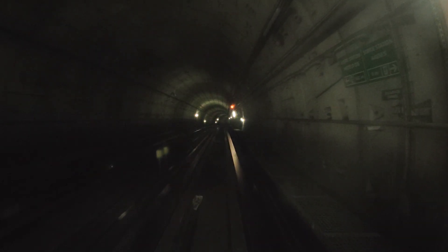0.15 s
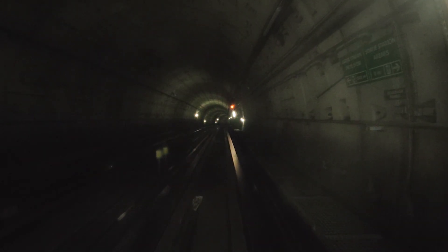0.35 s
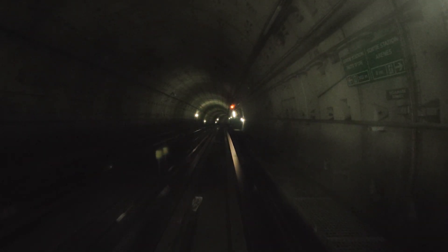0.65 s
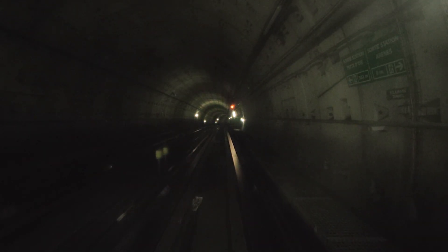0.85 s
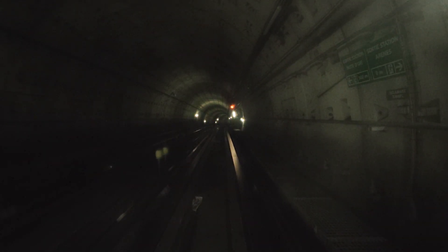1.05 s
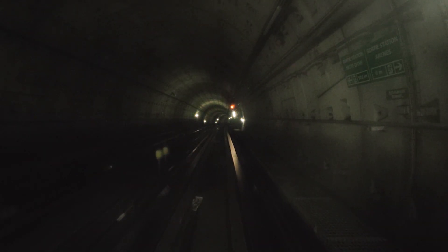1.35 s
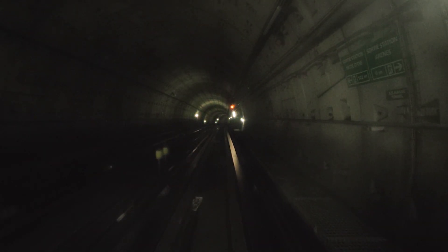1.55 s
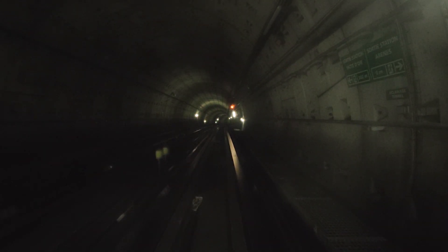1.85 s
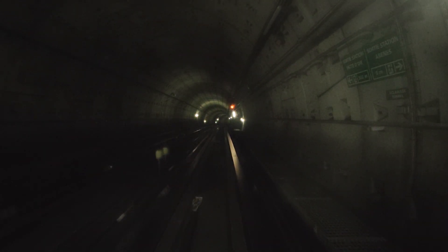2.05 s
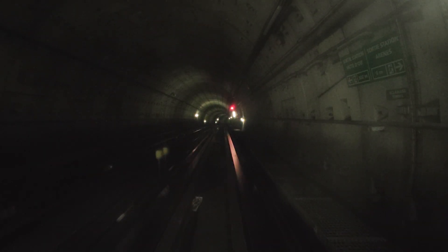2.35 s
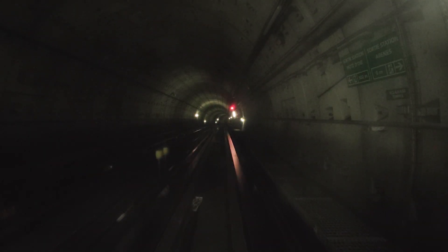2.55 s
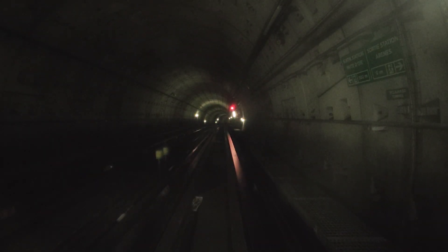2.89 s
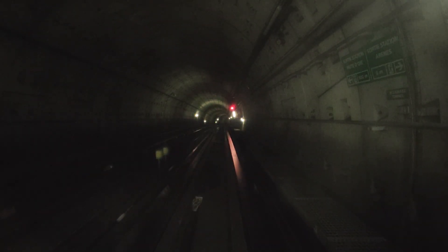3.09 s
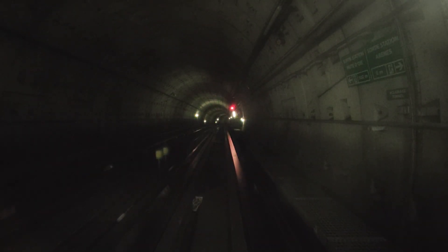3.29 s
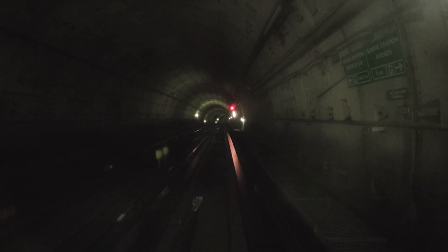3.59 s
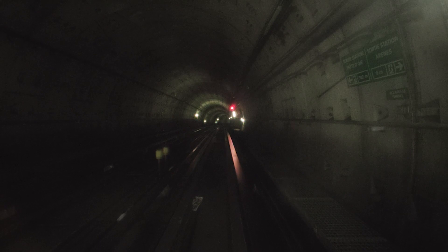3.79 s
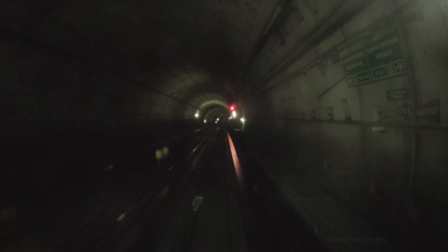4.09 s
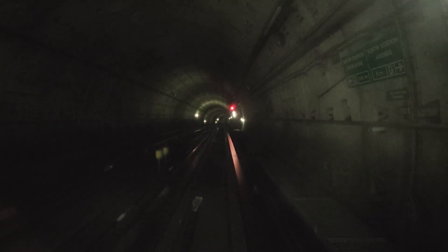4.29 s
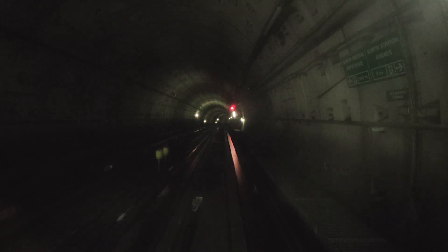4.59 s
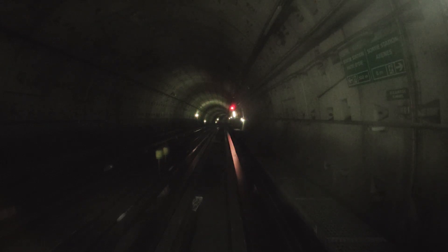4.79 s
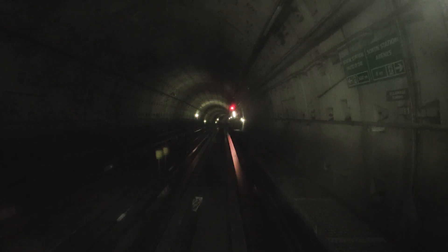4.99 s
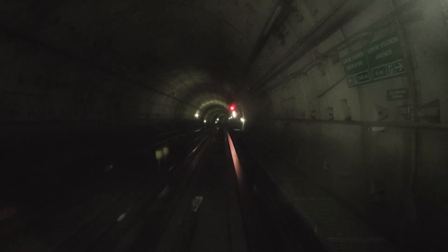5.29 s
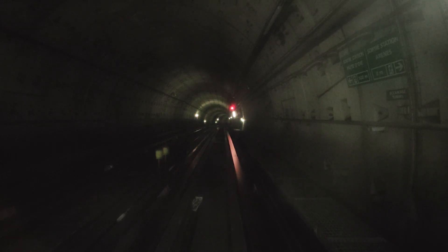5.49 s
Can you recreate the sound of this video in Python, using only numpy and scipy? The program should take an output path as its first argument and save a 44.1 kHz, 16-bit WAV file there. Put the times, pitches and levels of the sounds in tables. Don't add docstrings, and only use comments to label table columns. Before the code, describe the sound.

Interior of a rubber-tyred metro car in a tunnel, heard in stereo. Quiet uneven rumble and airy hiss come first, with small ticks. A low motor hum swells, then a loud double clunk stops it. Tunnel roar surges for over a second, then eases while latches and panels clack and rattle. A thin fan whine grows towards the end.

```python
import sys
import numpy as np
from scipy import signal
from scipy.io import wavfile
from scipy.ndimage import uniform_filter1d

SR = 44100
rng = np.random.default_rng(int(sys.argv[2]) if len(sys.argv) > 2 else 0)


def store_pcm(level_fs):
    pcm = np.round(np.clip(level_fs, -1, 1) * 32767).astype(np.int16)
    wavfile.write(sys.argv[1], SR, np.atleast_2d(pcm).T)


def volts_from_db(level):
    exponent = np.asarray(level, float) / 20
    return 10 ** exponent


N = 248724

# (frequency [Hz], density [dB per Hz])
FIZZ_COLOUR = [(3120, -9), (5300, -4.5), (6660, -0.5), (7190, -6.5), (8290, -6), (8990, -9.5),
               (11000, -5.5), (12100, 0.5), (13900, -6), (14600, -5), (15400, -19)]


def evened(x):
    return x / np.sqrt(np.mean(x ** 2) + 1e-20)


def read(points, hz):
    f, value = np.transpose(points)
    return np.interp(np.log(hz + 1), np.log(f + 1), value)


def curve(rows, column):
    table = np.transpose(rows)
    return np.interp(np.arange(N) / SR, table[0], table[column])


def diffuse(shape, patchy_db, flicker_db, size, slope_db=0, pivot_hz=1000):
    # (frequency [Hz], likeness [-1 to 1])
    likeness = [(60, 0.95), (130, 1), (290, 0.73), (640, 0.57), (850, 0.29), (1030, -0.93), (1200, -0.83),
                (1450, -0.34), (1750, -0.12), (2070, 1), (2400, 0.49), (2930, -0.44), (3500, -0.049),
                (4300, -0.035), (15000, -0.013)]
    # (frequency [Hz], left minus right [dB])
    balance = [(60, -1), (110, 0), (200, -1.5), (380, 0.0), (700, -3), (1290, -2.5), (2380, -2),
               (4400, 3.5), (8120, -6.5), (15000, 23.5)]
    hop = size // 4
    hz = np.fft.rfftfreq(size, 1 / SR)
    a, b, c, d, patches = rng.standard_normal((N // hop + 5, len(hz), 5), dtype=np.float32).T
    flicker = evened(uniform_filter1d(patches[0], size=3))
    patches = uniform_filter1d(patches, size=5, axis=0)
    patches = evened(uniform_filter1d(patches, size=8, axis=1))

    same = np.clip(read(likeness, hz), -.99, .99)[:, None]
    gain = volts_from_db(read(balance, hz)[:, None] / 2)
    left = a + 1j * b
    right = same * left + np.sqrt(1 - same ** 2) * (c + 1j * d)
    z = np.array([left * gain, right / gain])
    z /= np.sqrt(gain ** 2 + gain ** -2 + 2 * same)

    frame_starts = np.minimum(np.arange(len(flicker)) * hop, N - 1)
    slope_db = (slope_db * np.ones(N))[frame_starts]
    octaves = np.clip(np.log2((hz + 1) / pivot_hz), -1.5, 1.5)[:, None]
    z *= volts_from_db(read(shape, hz)[:, None] + slope_db * octaves + patchy_db * patches + flicker_db * flicker)
    x = signal.istft(z, nperseg=size, noverlap=size - hop)[1][:, :N]
    return x / np.std(x.mean(0))


def steadied(x, share):
    swell = uniform_filter1d(uniform_filter1d((x ** 2).mean(0), size=1200), size=1200)
    return evened(x / (swell + 0.08) ** (share / 2))


def wavering(hz, width_hz, steady, size=N):
    r = np.exp(-np.pi * width_hz / SR)
    a, b = rng.standard_normal((2, size + SR // 10))
    wander = signal.lfilter([1], [1, -2 * r, r ** 2], a + 1j * b)[-size:]
    wander /= np.sqrt(np.mean(abs(wander) ** 2))
    turns = np.cumsum(hz * np.ones(size)) / SR
    return evened(((steady + wander) * np.exp(2j * np.pi * turns)).real)


def tunnel():
    # (time [s], load [dB under full surge], draught [dB])
    effort = [(0, -14.5, 0.5), (.12, -19, 2), (.42, -17.5, 4.5), (.8, -20, -1.5), (1.05, -14.5, -1),
              (1.27, -14, 1.5), (1.55, -16.5, -3), (2.03, -13, 0), (2.14, -3.5, -7), (2.3, -7.5, -3.5),
              (2.6, -0.1, -1.2), (3.1, -0.8, 4), (3.36, -0.5, 2.5), (3.5, -8, 2), (3.95, -7.5, -1),
              (4.4, -9, -3), (5.0, -8.5, -2.5), (5.64, -10, -6)]
    # (frequency [Hz], density [dB per Hz])
    rumble_colour = [(13, -65), (22, -71), (59, -22), (83, -15.5), (119, 4), (167, 1), (232, -7.5),
                     (260, -7.5), (340, -35), (570, -120)]
    roar_colour = [(130, -34), (220, -6), (281, -3), (403, -3.5), (451, -6.5), (490, -5.5), (602, -12),
                   (763, -8), (926, -18.5), (980, -43), (1270, -47), (2160, -120)]
    hiss_colour = [(560, -8.5), (950, -5.5), (1050, -9), (1380, -1.5), (1500, -4), (1800, -3.5),
                   (2050, -6.5), (2520, -7.5), (2900, -12), (4380, -13.5), (5500, -26), (7150, -53),
                   (12100, -120)]
    # (time [s], swell [dB])
    bumps = [(.02, 6), (.56, 3), (.8, 5), (1.13, 4), (1.19, 5), (1.25, 3), (1.55, 6), (1.92, 5), (2.09, 8),
             (2.4, 6.5), (2.5, 5.5), (2.57, 7), (2.64, 6), (2.73, 1.5), (2.86, 6.5), (3.0, 3.5), (3.11, 6),
             (3.22, 3), (3.33, -0.5), (3.42, 0.5), (3.74, 4.5), (4.07, 0), (4.2, 4), (4.65, 0.5),
             (4.85, 3.5), (5.1, -2.5), (5.51, 4.5)]
    bump_s = 0.032
    # (level at full load [dB], share of load, share of draught,
    #  slope at full load [dB per octave], slope change [per dB of load])
    rumble_law, roar_law = (-17.5, 0.9235, 0.05, -1, 0.16), (-17.5, 1.0022, 0.01, -2.5, -0.2)
    hiss_law, fizz_law = (-36, 0.48, 0.31, -2.5, -0.233), (-49, 0.16, 1.04, .01, .01)
    load_db, draught_db = curve(effort, column=1), curve(effort, column=2)

    def level(law):
        return volts_from_db(law[0] + law[1] * load_db + law[2] * draught_db)

    def slope(law):
        return law[3] + law[4] * load_db

    t = np.arange(0, N, 64) / SR
    bumps_db = sum(db * np.exp(-((t - s) / bump_s) ** 2) for s, db in bumps)
    rumble = diffuse(rumble_colour, 2.7, 0.13, size=2048, slope_db=slope(rumble_law), pivot_hz=131)
    roar = diffuse(roar_colour, 1.1, 1.0, size=1024, slope_db=slope(roar_law), pivot_hz=377)
    hiss = diffuse(hiss_colour, 1.28, 0.24, size=1024, slope_db=slope(hiss_law), pivot_hz=2090)
    fizz = diffuse(FIZZ_COLOUR, 3.8, 0.35, size=1024)
    rumble = steadied(rumble, 0.7) * volts_from_db(np.repeat(bumps_db, 64)[:N])
    low = rumble * level(rumble_law) + roar * level(roar_law)
    high = hiss * level(hiss_law) + fizz * level(fizz_law)
    return low + high


def whine():
    # (time [s], level [dB], frequency [Hz])
    fan = [(0, -60.5, 1436), (1.3, -59, 1409), (1.85, -54.5, 1452), (2.0, -64, 1420), (4.38, -55, 1393),
           (4.8, -50, 1426), (5.08, -49.5, 1416), (5.2, -43.5, 1422), (5.64, -48, 1433)]
    hz = curve(fan, column=2)
    return np.array([wavering(hz, 16, 2.3), wavering(hz, 16, 2.1)]) * volts_from_db(curve(fan, column=1) + 4.0)


def squeaks():
    # (start [s], length [s], frequency [Hz], level [dB], width [Hz])
    rubs = [(-.1, .42, 7698, -58, 35), (.865, .225, 5113, -50.5, 7), (.775, .09, 5116, -60, 13),
            (1.08, .32, 2980, -51, 120), (3.84, .14, 1950, -42, 90), (3.865, .07, 2620, -43, 120),
            (1.06, .4, 3200, -49, 2000), (.15, .43, 2500, -49, 1800), (3.84, .09, 3550, -44, 400),
            (3.83, .18, 3200, -39, 2600), (.455, .1, 4200, -48, 700), (3.595, .08, 4300, -37, 2000),
            (4.25, .035, 3000, -35, 2400)]
    t, out = np.arange(N) / SR, np.zeros(N)
    for s, length, hz, db, width_hz in rubs:
        on = (t > s) & (t < s + length)
        fade = np.sin(np.pi * (t[on] - s) / length) ** .8
        out[on] += wavering(hz, width_hz, 25 / width_hz, size=on.sum()) * fade * volts_from_db(db)
    return out


def clacks():
    # (time [s], clatter [dB], thud [dB], fizz [dB])
    soft_blows = [(.0044, -34, -13.5, -53), (0.017, -20.5, -18.5, -43.5), (.5294, -33, -28, -44),
                  (1.07, -33, -19.5, -48), (2.135, -13.5, -4.5, -36.5), (2.166, -12, -18, -34),
                  (2.1828, -14, -5, -42), (2.1994, -35, -29, -55), (2.5194, -24, -10.5, -42.5),
                  (2.5985, -21, -22, -40), (2.9194, -28, -24, -39.5), (3.0694, -24, -25, -46),
                  (3.2191, -23, -12, -43), (3.621, -33, -7.5, -42), (4.151, -22, -24, -50),
                  (4.3794, -30, -35, -46.5), (4.5344, -24.5, -31, -46), (4.839, -16.5, -15, -29.5),
                  (4.909, -18, -11, -30), (5.077, -20, -17, -34)]
    # (time [s], clatter [dB], thud [dB], fizz [dB], time to fall 60 dB [s])
    sharp_ticks = [(.633, -30.5, -27, -47, 0.1), (.8709, -34, -30, -49, .097), (1.7744, -27, -27, -51, .13),
                   (2.181, -40, -40, -32, 0.096), (2.6683, -29, -27, -28, 0.037),
                   (2.753, -31, -14.5, -47, 0.058), (3.297, -26.5, -12.5, -49, 0.12),
                   (3.3862, -25, -19, -49, 0.2), (3.574, -25, -15, -58, 0.17),
                   (3.587, -16.5, -8.5, -35, 0.21), (3.725, -26.5, -42, -40, 0.098),
                   (4.077, -21, -27, -48, 0.045), (4.228, -40, -40, -42, 0.049),
                   (4.2511, -21.5, -12.5, -58, 0.2), (4.4904, -42, -34, -52, .08),
                   (5.1644, -29, -34, -61, 0.05)]
    # (time [s], clatter [dB], thud [dB], fizz [dB], time to fall 60 dB [s])
    rattles = [(.46, -31, -52, -44, .45), (2.091, -21.5, -11, -42, 0.4), (2.4694, -22.5, -19, -40.5, 0.43),
               (3.59, -17.5, -12.5, -40, 0.31), (3.845, -25.5, -24, -50, 0.74),
               (4.85, -23.5, -32, -47, 0.61), (5.085, -25.5, -43, -59, 0.46)]
    # (frequency [Hz], density [dB per Hz])
    thud_colour = [(88, -50), (150, -7.5), (262, -9.5), (415, -4.5), (619, -15), (822, -7.5), (1100, -71),
                   (1430, -55), (2420, -120)]
    clatter_colour = [(560, -3), (950, -10.5), (1200, -5.5), (1680, -2.5), (2070, -6), (2270, -2),
                      (2950, -9.5), (6000, -18), (7800, -25), (13200, -120)]
    soft_t60_s, soft_rise_s, tick_rise_s = 0.16, 0.0063, 0.0014
    rattle_rise_share = 0.034

    blows = [(*row, tick_rise_s) for row in sharp_ticks]
    blows += [(*row, soft_t60_s, soft_rise_s) for row in soft_blows]
    blows += [(*row, rattle_rise_share * row[-1]) for row in rattles]
    power = np.zeros((3, N // 32 + 1))
    t = np.arange(power.shape[1]) * 32 / SR
    for s, clatter_db, thud_db, fizz_db, t60, rise in blows:
        u = np.maximum(t - s, 0)
        swell = (1 - np.exp(-u / max(rise, 1e-3))) * volts_from_db(-60 * u / t60)
        levels = volts_from_db(np.array([[thud_db - 4.0], [clatter_db - 5.5], [fizz_db]]))
        power += (swell * levels) ** 2
    thud, clatter, fizz = np.repeat(np.sqrt(power) + 1e-9, 32, axis=1)[:, :N]

    hardness_db = np.clip(20 * np.log10(fizz / clatter) + 12, -15, 8)
    panels = diffuse(thud_colour, 1.8, 0.95, size=512)
    fittings = diffuse(clatter_colour, 0.73, 0.27, size=256, slope_db=0.52 * hardness_db, pivot_hz=1990)
    edges = diffuse(FIZZ_COLOUR, 3.9, 0.51, size=256)
    return thud * panels + clatter * fittings + fizz * edges


def rings():
    # (time [s], peak [dB], frequency [Hz], time to fall 60 dB
    # [s])
    struck_parts = [(1.068, -12, 173, .2), (1.085, -21, 85, .3), (1.19, -21, 75, .35),
                    (2.135, -10, 400, .22), (2.18, -16, 810, .12), (2.57, -13, 405, .15),
                    (2.615, -7, 165, .2), (2.89, -12, 320, .15), (3.075, -11, 285, .25),
                    (3.15, -9, 300, .22), (3.588, -18, 1010, .07), (3.59, -17, 420, .1),
                    (.007, -18, 260, .07), (2.46, -15, 190, .2), (3.845, -20, 760, .14),
                    (3.98, -19, 200, .2), (2.148, -11, 300, .06), (2.184, -12, 430, .1),
                    (3.92, -28, 510, .15), (4.06, -15, 120, .2), (5.03, -18, 120, .25),
                    (2.96, -11, 290, .16), (.0185, -19, 900, .05), (4.0785, -16, 800, .04),
                    (4.252, -10.5, 310, .1), (4.254, -11, 620, .08), (4.257, -26, 2500, .07),
                    (4.676, -41, 4856, .3), (4.676, -41, 4775, .2),
                    (0.018, -29, 807, 0.033), (1.773, -26.5, 860, 0.06), (2.097, -16, 680, 0.056),
                    (2.752, -16, 530, 0.042), (3.296, -14, 560, 0.079), (4.078, -28, 560, 0.07),
                    (4.491, -24, 680, 0.055), (5.174, -16.5, 730, 0.04)]
    out = np.zeros(N)
    for s, db, hz, t60 in struck_parts:
        u = np.arange(round(t60 * SR)) / SR
        part = out[round(s * SR):][:len(u)]
        start = 1 - np.exp(-u / (0.14 / hz + 0.0005))
        part += volts_from_db(db - 60 * u / t60) * start * np.sin(2 * np.pi * hz * u)
    return out


def motor():
    hum_hz, hum_db, growth_db_per_s = 139, -21.5, 8.5
    on_s, rise_s, off_s, cut_s = 1.525, .08, 2.15, .02
    u = np.arange(N) / SR - on_s
    running = np.clip(u / rise_s, 0, 1) * np.clip(1 - (u + on_s - off_s) / cut_s, 0, 1)
    return wavering(hum_hz, 6.7, 5.5) * volts_from_db(hum_db + growth_db_per_s * u) * running


def scene():
    return tunnel() + whine() + squeaks() + clacks() + rings() + motor()


def low_pass(x):
    return signal.sosfilt(signal.butter(12, 15600, fs=SR, output="sos"), x)


def record(dry):
    cut = signal.sosfilt(signal.butter(2, 38, "highpass", fs=SR, output="sos"), dry)
    return low_pass(.88 * np.tanh(cut / .9))


dry = scene()
out = record(dry)
store_pcm(out)
```